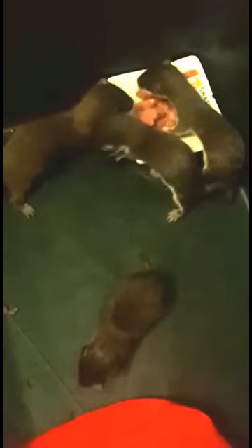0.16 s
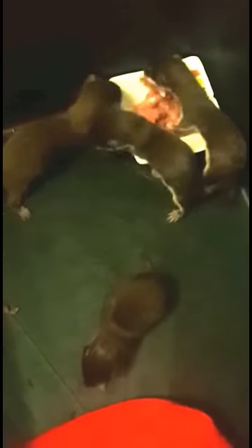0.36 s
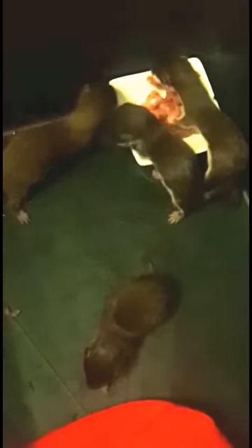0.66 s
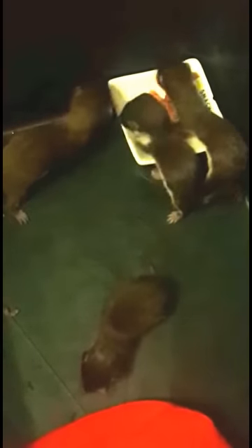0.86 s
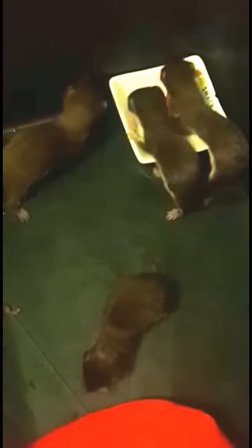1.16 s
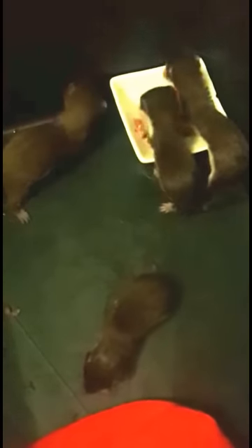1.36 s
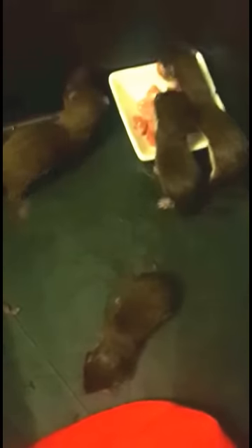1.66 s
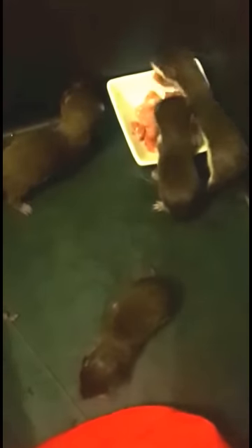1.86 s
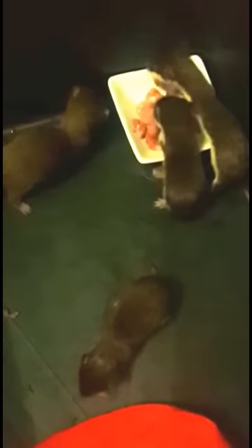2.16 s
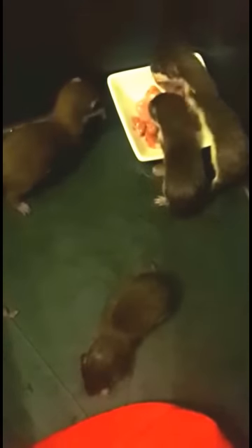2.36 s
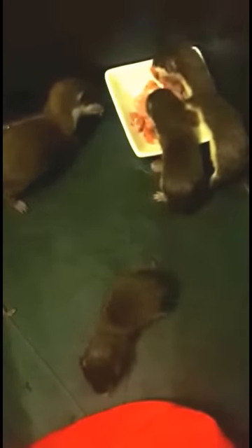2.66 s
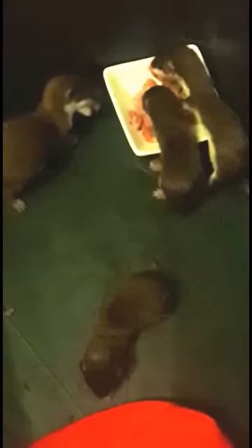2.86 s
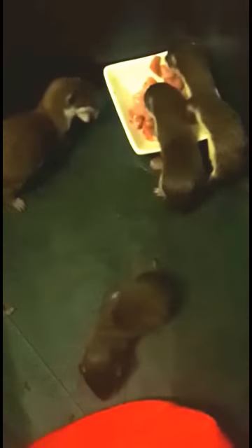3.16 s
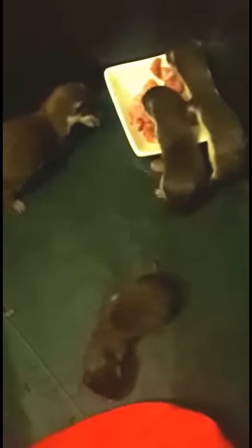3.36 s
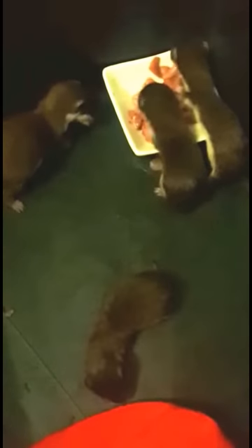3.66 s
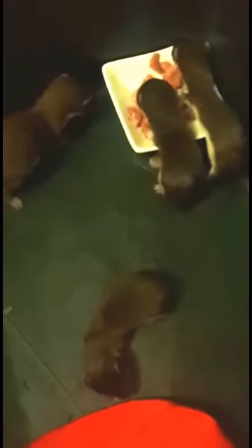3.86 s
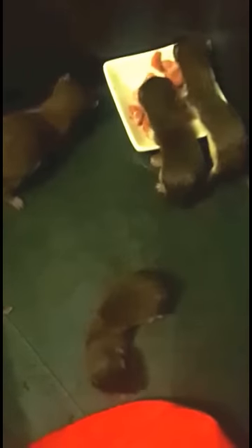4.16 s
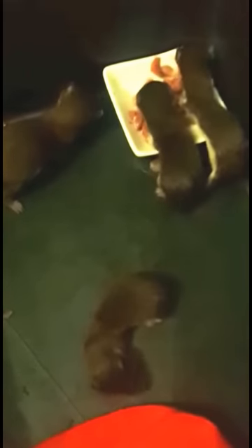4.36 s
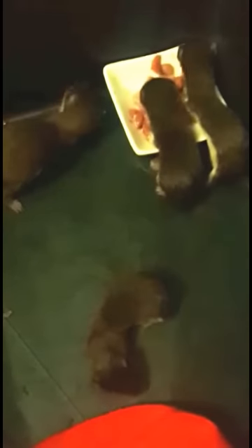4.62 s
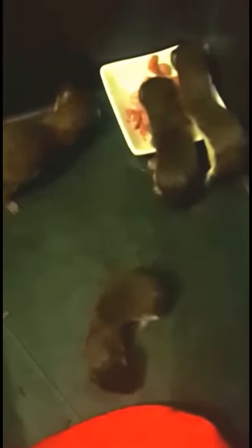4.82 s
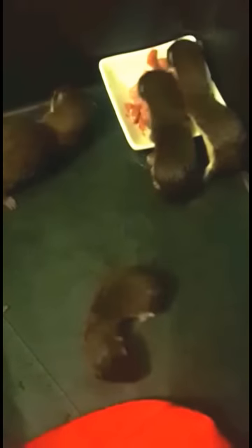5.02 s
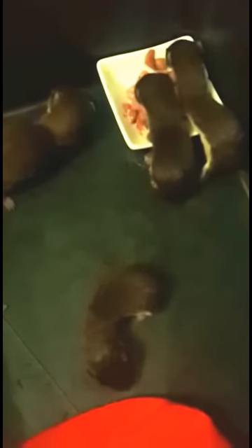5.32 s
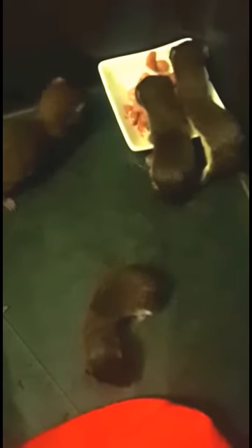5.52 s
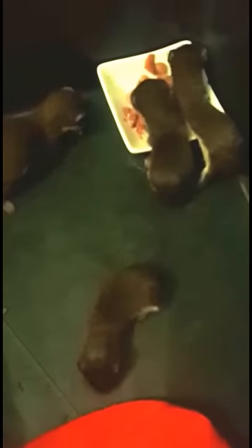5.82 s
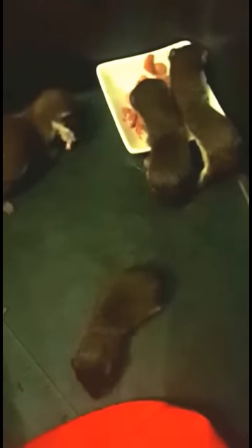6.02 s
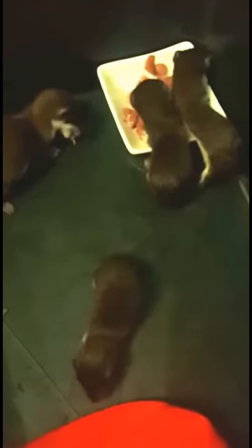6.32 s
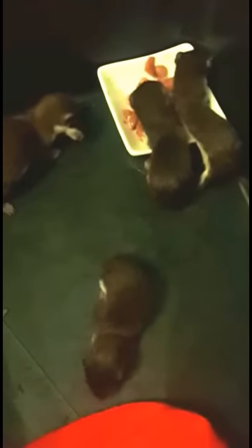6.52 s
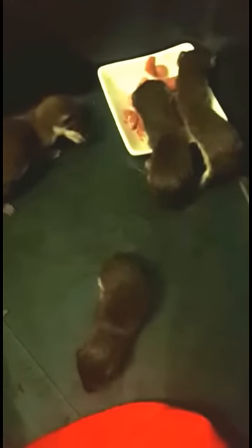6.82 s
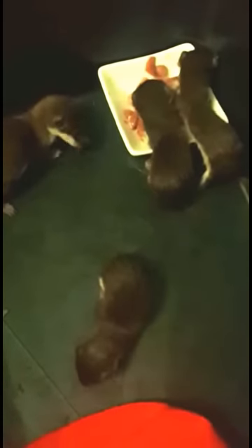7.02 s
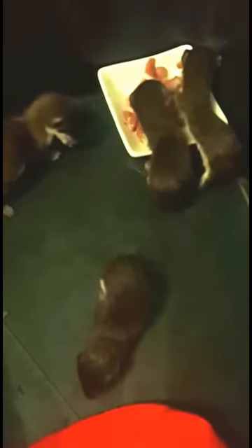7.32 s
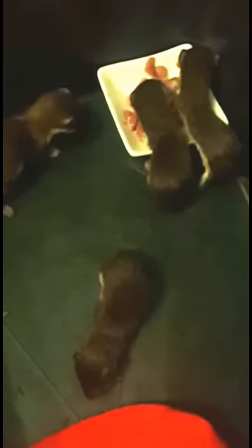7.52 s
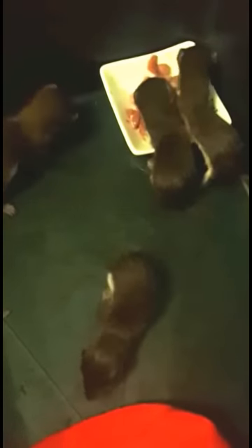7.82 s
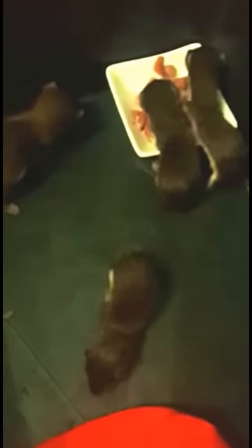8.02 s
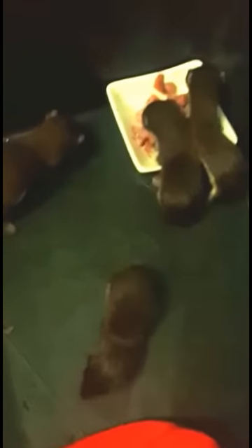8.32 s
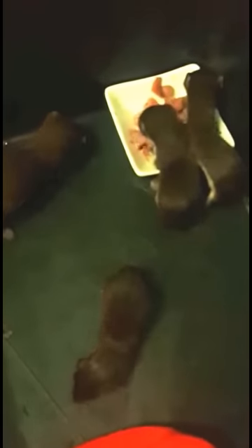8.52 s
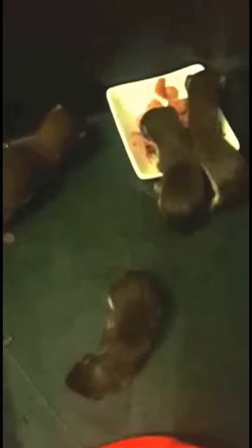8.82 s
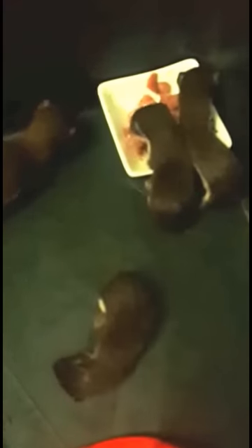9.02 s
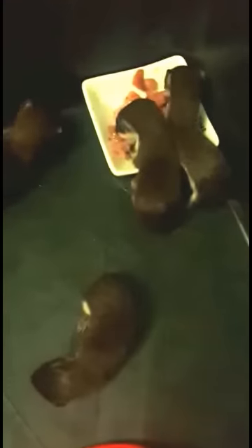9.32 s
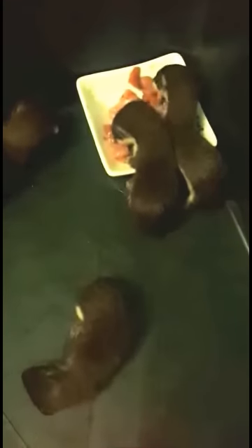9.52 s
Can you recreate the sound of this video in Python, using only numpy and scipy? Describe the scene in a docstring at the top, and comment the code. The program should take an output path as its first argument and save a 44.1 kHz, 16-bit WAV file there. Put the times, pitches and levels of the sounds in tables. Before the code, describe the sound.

After a brief squeaky scuffle, young weasel-like animals eat raw meat with quiet tooth clicks, squelches and dull paw thumps.

```python
"""Four shrill squeaks open a quarrel among young weasel-like animals sharing raw meat from a plastic tray.
Tiny vocal folds make each squeak, which glides and rasps. Then teeth click, lips smack and wet meat
squelches, while paws and the nudged tray bump the hollow floor of the pen. Fur rubs on the floor in
the opening scuffle, and again near the end as a body turns. The pen's walls throw back the voices,
bites and bumps over a soft hiss with a faint hum and whine."""
import sys
import numpy as np
from scipy import signal
from scipy.fft import rfft, irfft
from scipy.io import wavfile
from scipy.ndimage import uniform_filter1d

SR = 44100
rng = np.random.default_rng(int(sys.argv[2]) if len(sys.argv) > 2 else 0)


def store_wav(level_fs):
    """Save 16-bit WAV to argv[1]."""
    pcm = np.round(np.clip(np.atleast_2d(level_fs), -1, 1) * 32767)
    wavfile.write(sys.argv[1], SR, pcm.T.astype(np.int16))


N = 426885
TIME, HZ = np.arange(N) / SR, np.fft.rfftfreq(N, 1 / SR)


def squeak(glide, open_hz, overtones_db, roughness, jitter=0.11, rasp_s=0.0013, shut_s=0.018):
    """Tiny vocal folds glide under a mouth resonance that moves to their pitch as the jaw shuts."""
    # the small throat's colour: freq_hz, gain_db
    throat = [(1000, -37.5), (1900, -6), (2500, -3.5), (3100, -5.5), (4200, 1.5), (5000, -2), (6200, 4),
              (7600, -11.5), (9000, -12), (10500, -15.5), (12500, -18), (14000, -8), (16000, -32.5)]
    times, pitches, levels = np.transpose(glide)
    t = np.arange(times[0], times[-1], 1 / SR)
    hz, level_db = np.interp(t, times, pitches), np.interp(t, times, levels)
    # the folds rasp as they start and stop
    rough = roughness + 0.79 * np.exp((times[0] - t) / rasp_s) + 0.34 * np.exp((t - times[-1]) / rasp_s)
    shut = np.exp(-((times[-1] - t) / shut_s) ** 2)
    mouth_hz = open_hz + (hz - open_hz) * shut
    shake, flutter = (wobble(len(t), SR // rate_hz) for rate_hz in (1600, 500))
    cycles = np.cumsum(hz * (1 + jitter * rough * shake)) / SR
    harmonic = np.arange(1, 8)[:, None]
    partial_hz = harmonic * hz
    mouth = 1 + gain_of(11) / (1 + ((partial_hz - mouth_hz) / 550) ** 2)
    brightness_db = (harmonic > 1) * (overtones_db - 4.5 * shut)  # a shut mouth muffles the overtones
    weights = mouth * gain_of(curve_at(throat, partial_hz) + brightness_db) * (partial_hz < SR / 2)
    tone = (weights * np.sin(2 * np.pi * harmonic * cycles)).sum(0) / np.sqrt((weights ** 2).sum(0) / 2)
    breath = coloured(rng.standard_normal(N), throat)[:len(t)]
    call = tone * (1 + rough * flutter) + 0.49 * rough * breath
    return times[0], gain_of(level_db) * call * signal.windows.tukey(len(t), .04)


def quarrel(echo_db=-11):
    """Four squeaks, a quarter cycle apart in left and right, with eight quick echoes off near walls."""
    # one glide per squeak, each a list of: time_s, pitch_hz, level_db
    glides = [
        [(.035, 4790, -43), (.04, 4360, -33), (.048, 3980, -35.5), (.07, 4484, -32.5), (.09, 4730, -38.5),
         (.108, 4624, -41), (.121, 4200, -30), (.137, 3072, -50)],
        [(.244, 2940, -43), (.248, 3070, -25), (.252, 3200, -28.5), (.255, 1886, -36.5), (.26, 1863, -26),
         (.279, 2080, -29.5), (.291, 2095, -28), (.297, 2740, -22), (.302, 2480, -49.5)],
        [(.447, 4670, -57), (.453, 4834, -35), (.464, 5160, -24), (.472, 4945, -16), (.479, 4870, -24.5),
         (.489, 4670, -23.5), (.496, 3700, -55)],
        [(.766, 3370, -37.5), (.779, 3767, -39), (.787, 3816, -32.5), (.799, 3400, -40.5), (.808, 3126, -28),
         (.816, 3135, -39), (.835, 3200, -34), (.843, 2534, -24.5), (.847, 2000, -35)],
    ]
    # the voice of each squeak: open_mouth_hz, overtones_db, roughness (0-1), pan_db
    voices = [(4440, 12.5, 0.06, 0), (6100, -8.5, .2, 0), (5000, 2, 0.06, 4), (6910, -7.5, 0.13, 3)]
    voice = np.zeros((2, N))
    for glide, (open_hz, overtones_db, roughness, pan_db) in zip(glides, voices):
        start_s, call = squeak(glide, open_hz, overtones_db, roughness)
        add(voice, start_s, pan(pan_db) * np.array([call, signal.hilbert(call).imag]))
    echoes = np.zeros((2, SR // 60))
    delays = rng.integers(SR // 500, SR // 60, (2, 8))
    np.put_along_axis(echoes, delays, rng.choice([-1., 1.], (2, 8)), 1)
    return voice + gain_of(echo_db) * signal.oaconvolve(voice, echoes / np.sqrt(8), axes=1)[:, :N]


def squelch(swell_s=0.00906, clump=0.48):
    """Wet meat parts in a short cluster of tiny pops, each cluster at its own pitch."""
    t = np.arange(SR // 16) / SR
    pops = rng.standard_normal((2, len(t))) * np.exp(clump * wobble(len(t), 40))
    lo_hz, hi_hz = np.array([5200, 8600]) * rng.uniform(.87, 1.13)
    fizz = band(pops, lo_hz, hi_hz) * t / swell_s * np.exp(-t / swell_s)
    return fizz / fizz[:, SR // 125:SR // 36].std()


def mouth_click(ring_hz, jaw_db, ring_db, crack_db, wet_db, pan_db, snap_s=.0012, right_lag_s=.0005):
    """A tooth crack rings jaw and mouth, then a squelch; the near wall answers mostly on the right."""
    t = np.arange(SR // 16) / SR
    wall = np.array([[.3], [.7]]) * np.roll(burst(t, snap_s), rng.integers(SR // 600, SR // 220), 1)
    snap = burst(t, snap_s) + 0.37 * burst(t, fall_s=0.0054) + wall
    snap *= np.exp(.35 * rng.standard_normal(len(t)))  # grit
    edge = snap + 1.58 * burst(t, fall_s=.00045)  # the treble is the briefest part
    jaw = unit_rms(band(snap, 600, 2700))
    ring = unit_rms(band(snap, ring_hz / 1.29, ring_hz * 1.29))
    mouth = unit_rms(ring + 0.33 * unit_rms(band(snap, 2400, 7500, order=3)))
    crack = unit_rms(band(edge, 7500, 10800, order=3) + 0.86 * band(edge, 11500, 16060))
    click = gain_of(jaw_db - 3) * jaw + gain_of(ring_db - 2) * mouth + gain_of(crack_db - 2) * crack
    left, right = (click / 2 + gain_of(wet_db) * squelch()) * pan(pan_db)
    return np.array([left, np.roll(right, round(right_lag_s * SR))])


def bite(ring_hz, ring_db, crack_db):
    """One bite: the lower the mouth rings, the more jaw is heard and the further left it sits."""
    octaves = np.log2(ring_hz / 6000)
    jaw_db = ring_db - 18 - 16.5 * octaves
    return mouth_click(ring_hz, jaw_db, ring_db, crack_db, wet_db=ring_db - 20.5, pan_db=2.5 - 5 * octaves)


def clear_bites():
    """Teeth snap shut on the meat, in clicks that stand out one by one."""
    # the bites, with relative levels: start_s, ring_hz, ring_db, crack_db
    bites = [(0.016, 6330, -50.5, -72), (0.0965, 7200, -51, -46), (0.341, 6170, -45.5, -47.5),
             (.386, 5830, -65, -54), (.536, 6950, -54, -54), (0.556, 6900, -48, -49),
             (0.6167, 6450, -42.5, -55), (0.6333, 5600, -43.5, -48.5), (0.887, 5600, -49, -49.5),
             (0.9072, 5800, -51, -62), (.9713, 7640, -49.5, -51), (1.0437, 5600, -52, -57),
             (1.058, 5440, -51, -51), (1.2323, 7300, -50.5, -60), (1.249, 7200, -51.5, -74),
             (1.372, 4700, -49.5, -62), (1.4856, 6840, -55, -63), (1.557, 6860, -54.5, -63),
             (1.5918, 8260, -56, -55.5), (1.7155, 7340, -54.5, -68), (1.7288, 5380, -58, -59),
             (1.801, 6200, -56.5, -59.5), (1.8434, 6460, -55, -57), (1.85, 6260, -51.5, -63),
             (1.925, 6500, -58, -60), (1.8773, 5160, -61, -68), (2.106, 7060, -58.5, -64),
             (2.132, 7430, -65, -62), (2.276, 6370, -55, -69), (2.419, 6600, -64, -62),
             (2.643, 6200, -62, -76), (2.7123, 5300, -67, -62), (2.8433, 7670, -53.5, -74),
             (2.8853, 6700, -51.5, -70), (2.9825, 6600, -60, -64), (3.1467, 8600, -73, -57),
             (3.227, 6700, -52.5, -66), (3.514, 6800, -54, -66), (3.549, 5800, -68, -63),
             (4.2104, 4520, -52, -63), (4.338, 5100, -58.5, -66), (4.349, 5400, -56, -61),
             (4.757, 5000, -57, -65), (4.8006, 6800, -66, -61.5), (4.985, 6270, -59, -59),
             (5.0495, 6000, -48, -49.5), (5.3258, 8240, -59, -56), (5.3096, 7100, -62.5, -66.5),
             (5.5393, 8200, -58.5, -67.5), (5.6042, 5200, -58, -58), (5.6912, 5900, -61, -69),
             (5.739, 4800, -60, -67), (5.8561, 5450, -58, -74), (5.9298, 6300, -64, -62.5),
             (6.025, 6630, -60.5, -62), (6.1212, 5430, -61, -59), (6.1685, 4360, -52.5, -65),
             (6.2239, 7000, -51.5, -65), (6.3715, 5350, -62, -65), (6.3944, 4350, -52.5, -75),
             (6.4963, 3500, -59.5, -84), (6.796, 5170, -53.5, -78), (6.6017, 7100, -62.5, -78),
             (7.0138, 4880, -64, -68), (7.082, 5250, -59.5, -56), (7.1172, 4570, -46.5, -52.5),
             (7.2158, 4940, -58, -68), (7.2413, 7900, -62, -66), (7.4395, 8570, -67, -65),
             (7.6418, 5300, -57, -58.5), (7.9588, 5000, -57, -73), (8.3865, 4470, -51.5, -66),
             (8.5863, 5100, -62, -64), (8.745, 5100, -50.5, -66), (8.7662, 6100, -54, -64),
             (8.812, 6640, -54, -69), (9.0463, 6600, -53.5, -62), (9.1124, 3930, -46, -59),
             (9.3182, 4670, -58.5, -77), (9.6427, 7670, -55, -67), (9.664, 5800, -48, -71)]
    out = np.zeros((2, N))
    for start_s, ring_hz, ring_db, crack_db in bites:
        add(out, start_s, bite(ring_hz, ring_db, crack_db))
    return out


def chewing(wet_lead_s=0.0035):
    """Two jaws chew in even strokes: one slow with dull smacks, one quick with squelches."""
    # bouts of slow, dull chewing: first_stroke_s, last_stroke_s, level_db
    dull_bouts = [(3.7204, 4.567, -64), (4.8247, 6.1226, -64.5), (6.5727, 7.7366, -69)]
    # bouts of quick, wet chewing: first_stroke_s, last_stroke_s, level_db
    wet_bouts = [(2.022, 2.28, -67.5), (3.443, 3.909, -68), (4.129, 5.171, -68), (5.399, 6.283, -69),
                 (6.51, 7.994, -66), (8.206, 8.68, -67)]
    out = np.zeros((2, N))
    for first_s, last_s, db in dull_bouts:
        for stroke_s in strokes(first_s, last_s, every_s=.31):
            smack = mouth_click(3640, jaw_db=db, ring_db=db - 8, crack_db=db - 19, wet_db=db - 15, pan_db=6)
            add(out, stroke_s, smack)
    for first_s, last_s, db in wet_bouts:
        for stroke_s in strokes(first_s, last_s, every_s=.22):
            add(out, stroke_s - wet_lead_s, gain_of(db) * squelch(swell_s=0.0057, clump=0.43))
    return out


def nibbles(count=30, ring_hz=6800, ring_db=-70, crack_db=-72):
    """Faint small bites go on throughout, uneven in timing, pitch and force."""
    out = np.zeros((2, N))
    starts = (np.arange(count) + rng.random(count)) * N / SR / count
    for start_s, (pitch, force, edge) in zip(starts, np.clip(rng.standard_normal((count, 3)), -2, 2)):
        add(out, start_s, bite(ring_hz * np.exp(0.18 * pitch), ring_db + 2 * force, crack_db + 4 * edge))
    return out


def gnawing(ticks_per_s=130, bands=12, spread_db=3.5, rest_db=-77.5, trim_db=-2):
    """A bed of faint wet ticks that swells whenever a strip of meat is torn."""
    # the tears: peak_s, swell_s, level_db
    tears = [(.16, 0.023, -52), (.5, 0.033, -42), (.81, 0.12, -65), (1.3, 0.06, -61.5), (3.2, .22, -67),
             (4.97, 0.19, -73.5), (6.17, .1, -78), (7.13, 0.18, -70), (8.26, 0.34, -73), (9.16, 0.4, -66.5)]
    out, t = np.zeros((2, N)), np.arange(SR // 40) / SR
    for hz in np.geomspace(4300, 10000, bands):
        onsets = rng.random(N) < ticks_per_s / bands / SR
        force = gain_of(spread_db * np.minimum(rng.exponential(1, N), 3))
        tick = unit_rms(band(burst(t, fall_s=0.0086), hz * 0.61, hz * 1.37))
        out += signal.oaconvolve((onsets * force)[None], tick, axes=1)[:, :N]
    tearing = sum(gain_of(db) * np.exp(-((TIME - peak_s) / swell_s) ** 2) for peak_s, swell_s, db in tears)
    return unit_rms(out) * (gain_of(rest_db) + tearing) * gain_of(trim_db)


def floor_blow(boom_db, knock_db, tap_db, ring_share, rise_s=0.0018, width=0.52):
    """A blow rings the hollow floor for a share of its decay time, with a dull knock and a sharp tap."""
    # the floor's modes: freq_hz, level_db, t60_s
    board = [(83, -23, 0.92), (113, -7.5, 0.34), (178.9, 4, 0.24), (216.4, -3.5, 0.29), (278.3, 5.5, 0.17),
             (368, -11, 0.23), (405, -7, 0.065)]
    t = np.arange(SR // 4) / SR
    modes = np.zeros(len(t))
    for hz, db, t60_s in board:
        decay = gain_of(db + 2 * rng.standard_normal() - 60 * t / (t60_s * ring_share))
        modes += decay * np.sin(2 * np.pi * (hz * rng.uniform(.93, 1.03) * t + rng.random()))
    boom = band(modes * (1 - np.exp(-t / rise_s)), 85, 1800, order=3)  # heard without deep bass
    blow = gain_of(boom_db) * boom / boom[:SR // 20].std()
    knock = band(burst(t, fall_s=0.0085), 350, 725)
    tap = band(burst(t, fall_s=0.0043), 1480, 2690)
    for db, (mid, side) in ((knock_db, knock), (tap_db, tap)):
        hit = mid + width * np.array([side, -side])
        blow = blow + gain_of(db) * hit / hit[:, :SR // 50].std()
    return np.array([blow[0], np.roll(blow[1], 9)])  # the right side lags by 0.2 ms


def paw_steps(usual_weight_db=-58, usual_knock_db=-61):
    """Paws boom on the floor and claws tap it; heavier steps knock harder."""
    # the footfalls: start_s, weight_db, claw_db
    steps = [(.001, -55, -76), (0.062, -48.5, -75), (0.9514, -49.5, -56), (1.136, -60, -72),
             (1.2574, -72.5, -85), (1.5185, -52, -57), (1.6648, -65, -80), (2.7563, -74, -93.5),
             (2.9748, -74, -78), (3.0277, -59, -66), (3.067, -65.5, -68), (3.172, -70.5, -80),
             (3.235, -62.5, -69), (4.172, -73, -79.5), (5.004, -70, -85), (6.223, -72.5, -79),
             (6.7374, -70, -73), (6.784, -72, -83.5), (6.99, -57, -60), (7.2015, -58.5, -60.5),
             (7.4078, -63.5, -68.5), (7.619, -65, -68), (7.8517, -64.5, -69), (7.917, -69, -72.5),
             (8.0579, -59.5, -63), (8.2762, -46, -42), (8.413, -67.5, -85), (8.4966, -64, -68),
             (8.7031, -64.5, -74), (9.0716, -63.5, -66), (9.3771, -63.5, -65)]
    out = np.zeros((2, N))
    for start_s, weight_db, claw_db in steps:
        knock_db = usual_knock_db + 1.34 * (weight_db - usual_weight_db)
        add(out, start_s, floor_blow(weight_db, knock_db, claw_db, ring_share=0.96))
    return out


def tray_knocks():
    """The nudged tray knocks drily, because it damps the floor it strikes."""
    # the nudges: start_s, thud_db, knock_db
    nudges = [(6.3673, -82, -67.5), (6.442, -76, -72.5), (7.117, -89, -61.5), (8.524, -73, -69),
              (8.8389, -65.5, -65.5), (8.866, -68, -69), (8.9732, -57, -77)]
    out = np.zeros((2, N))
    for start_s, thud_db, knock_db in nudges:
        add(out, start_s, floor_blow(thud_db, knock_db, tap_db=knock_db - 5, ring_share=0.13))
    return out


def fur_rubbing(turn_grain_db=2.0, scuffle_grain_db=7.5):
    """Fur rubs on the floor: unevenly in the scuffle, smoothly when a body turns."""
    # the swell of the turning body: time_s, level_db
    turn_swell = [(8.1, -76.5), (8.41, -66.5), (8.692, -67), (8.91, -62), (9.084, -61.5), (9.202, -62),
                  (9.4, -71), (9.55, -114)]
    # the fading scuffle: time_s, level_db
    scuffle_fade = [(0, -57.5), (.2, -69), (.5, -65), (.7, -69.5), (1.05, -67.5), (1.4, -83.5),
                    (1.9, -75.5), (2.3, -98.5)]
    # the colour of fur on the floor: freq_hz, gain_db
    fur_colour = [(40, -13), (120, 4), (850, -1.5), (1100, -2.5), (1450, -6), (2900, -3.5), (4000, -5.5),
                  (5100, 2.5), (7300, -4), (9000, -13), (12500, -12), (14500, -18), (16000, -13.5)]
    grain = np.minimum(wobble(N, 300), 2)
    turn_db = np.interp(TIME, *np.transpose(turn_swell), left=-120, right=-120) + turn_grain_db * grain
    scuffle_db = np.interp(TIME, *np.transpose(scuffle_fade)) + scuffle_grain_db * grain
    return (gain_of(turn_db) + gain_of(scuffle_db)) * coloured(rng.standard_normal((2, N)), fur_colour)


def pen_reverb(x):
    """The walls return a diffuse tail after 8 ms, each band dying at its own speed."""
    # the pen's decay times: freq_hz, t60_s
    decay_times = [(100, 0.067), (1000, 0.27), (2500, 0.13), (4800, 0.2), (8000, 0.093), (15000, 0.276)]
    hz, t, noise = signal.stft(rng.standard_normal((2, SR // 2)), SR, nperseg=256)
    decay = gain_of(-60 * t / curve_at(decay_times, hz)[:, None])
    tail = signal.istft(noise * decay, SR, nperseg=256)[1]
    tail[:, :SR // 125] = 0
    return signal.oaconvolve(x, tail / np.linalg.norm(tail[0]), axes=1)[:, :N]


def room_tone(hiss_db=-69):
    """Soft hiss, partly alike on both sides in the bass, with a faint hum and a thin whine."""
    # the colour of the hiss: freq_hz, gain_db
    hiss_colour = [(20, -1), (45, 2.5), (60, -17), (85, 0), (180, 1.5), (350, -3.5), (600, -3), (1500, -8),
                   (3500, -8.5), (5300, -6), (8000, -11.5), (11000, -13), (15300, -6.5)]
    # the high tones of the whine: pitch_hz, level_db
    whine_tones = [(4646, -84.5), (7200, -90.5), (14450, -93)]
    # the room's steady hum: pitch_hz, level_db
    hum_tones = [(82, -87.5), (180, -92.5), (280, -100)]
    noise = rng.standard_normal((2, N))
    alike = curve_at([(100, 0.23), (500, 0.31), (1500, 0.033)], HZ)
    noise[1] = irfft(alike * rfft(noise[0]) + np.sqrt(1 - alike ** 2) * rfft(noise[1]), N)
    waver_hz = 14 * wobble(N, 400)
    whine = sum(gain_of(db) * unit_rms(np.sin(2 * np.pi * np.cumsum(hz + waver_hz) / SR))
                for hz, db in whine_tones)
    hum = sum(gain_of(db) * unit_rms(np.sin(2 * np.pi * hz * TIME)) for hz, db in hum_tones)
    return gain_of(hiss_db) * coloured(noise, hiss_colour) + whine + hum


def strokes(first_s, last_s, every_s):
    """Evenly spaced jaw strokes through one bout, about every_s apart."""
    return np.linspace(first_s, last_s, round((last_s - first_s) / every_s) + 1)


def burst(t, fall_s):
    """A dying puff of stereo noise."""
    return rng.standard_normal((2, len(t))) * np.exp(-t / fall_s)


def wobble(length, smooth_samples):
    """A smoothed random wander at rms 1."""
    return unit_rms(uniform_filter1d(rng.standard_normal(length), smooth_samples))


def band(x, lo_hz, hi_hz, order=2):
    """Causal band-pass."""
    return signal.sosfilt(signal.butter(order, [lo_hz, hi_hz], "band", fs=SR, output="sos"), x)


def coloured(x, colour):
    """Gives a full-length sound a spectrum, at rms 1."""
    return unit_rms(irfft(rfft(x) * gain_of(curve_at(colour, HZ)), N))


def curve_at(points, hz):
    """Reads a curve on a log-frequency axis."""
    freqs, values = np.transpose(points)
    return np.interp(np.log(hz + 1), np.log(freqs + 1), values)


def gain_of(db):
    """Decibels to amplitude."""
    return 10 ** (np.asarray(db) / 20)


def pan(db):
    """Left and right gains, db apart; positive leans left."""
    return gain_of([[db / 2], [-db / 2]])


def unit_rms(x):
    """Scales to rms 1."""
    return x / np.sqrt(np.mean(x ** 2) + 1e-30)


def add(mix, start_s, sound):
    """Lays a stereo sound into the mix."""
    part = mix[:, max(0, round(start_s * SR)):][:, :sound.shape[-1]]
    part += sound[..., :part.shape[-1]]


def scene(voice_db=-1, voice_send_db=-15, mouth_send_db=-11, bump_send_db=-15):
    """Squeaks, mouths and bumps, each with its share of reverb, over fur and room tone."""
    voice = gain_of(voice_db) * quarrel()
    mouths = clear_bites() + chewing() + nibbles() + gnawing()
    bumps = paw_steps() + tray_knocks()
    ringing = voice + 3.0 * band(voice, 4380, 5880)  # the pen rings most readily near 5 kHz
    send = gain_of(voice_send_db) * ringing + gain_of(mouth_send_db) * mouths
    send += gain_of(bump_send_db) * bumps
    return voice + mouths + bumps + pen_reverb(send) + fur_rubbing() + room_tone()


def record(dry):
    """A steep low-pass takes off the very top of the treble."""
    low_pass = signal.firwin(511, 15600, window=("kaiser", 9), fs=SR)
    return signal.oaconvolve(dry, low_pass[None], "same", axes=1)


dry = scene()
out = record(dry)
store_wav(out)
```